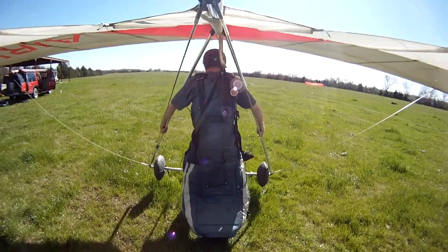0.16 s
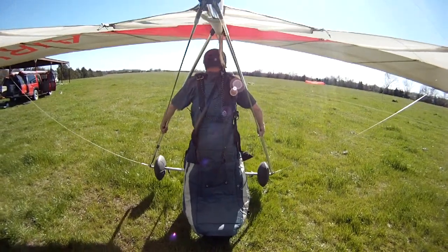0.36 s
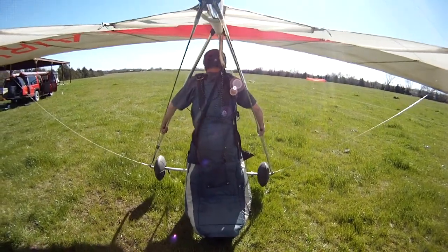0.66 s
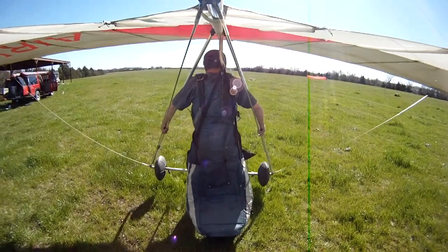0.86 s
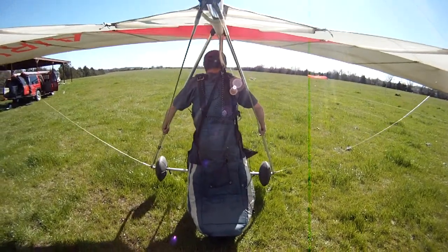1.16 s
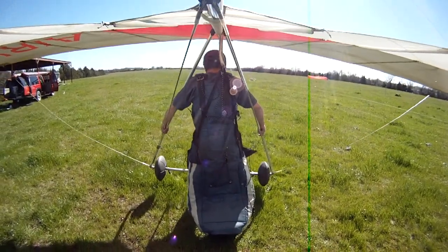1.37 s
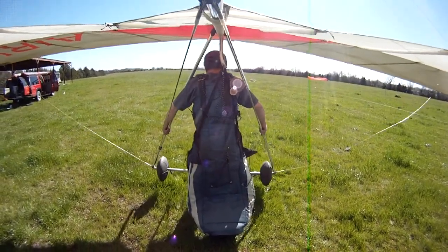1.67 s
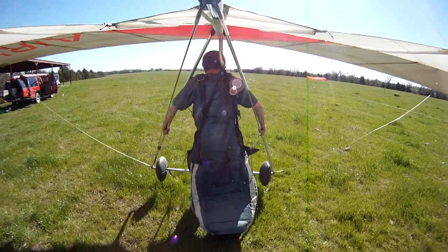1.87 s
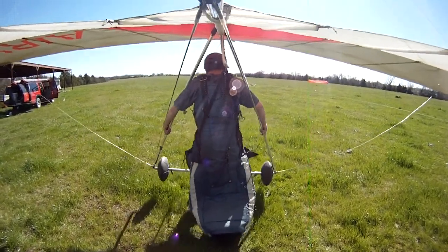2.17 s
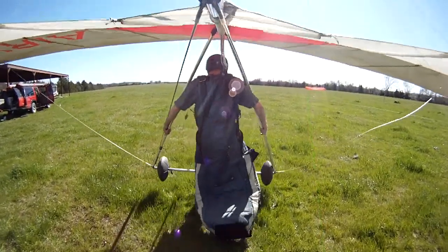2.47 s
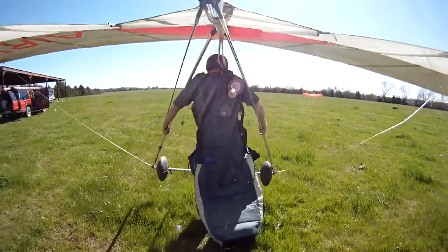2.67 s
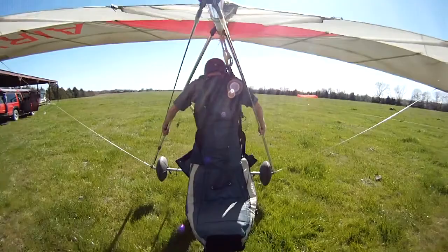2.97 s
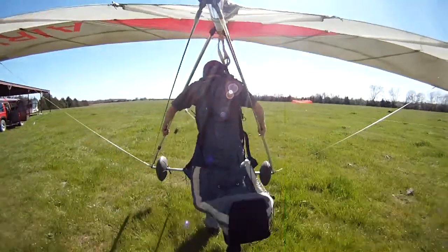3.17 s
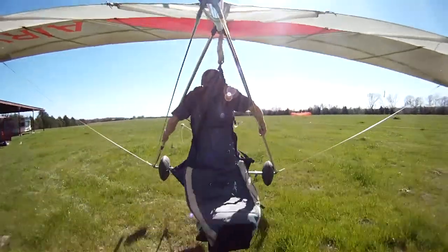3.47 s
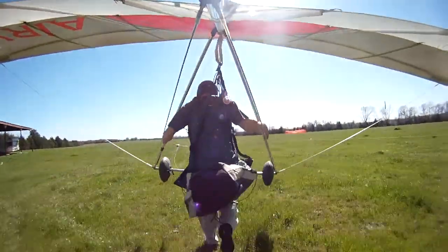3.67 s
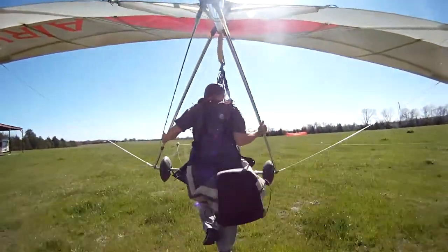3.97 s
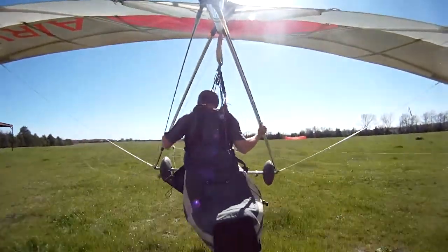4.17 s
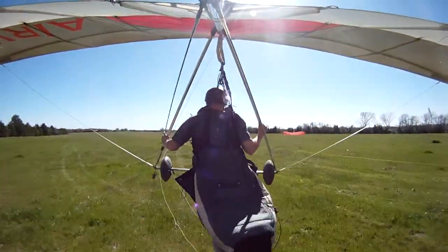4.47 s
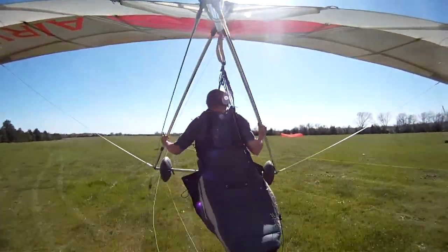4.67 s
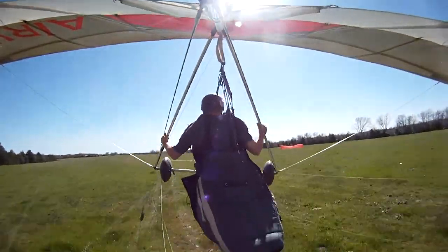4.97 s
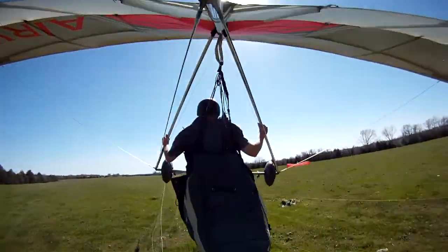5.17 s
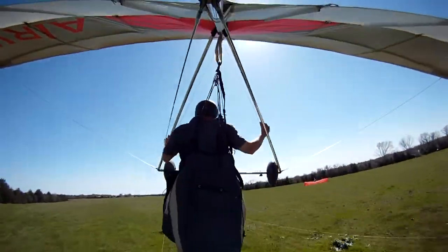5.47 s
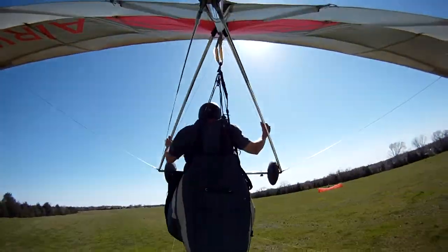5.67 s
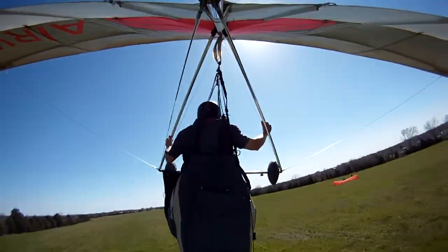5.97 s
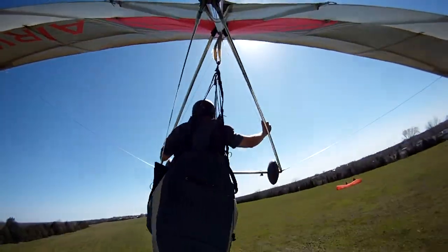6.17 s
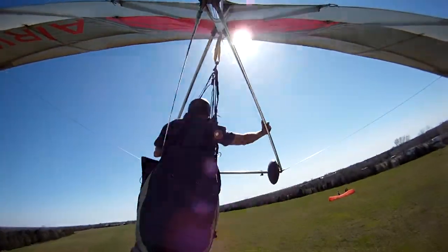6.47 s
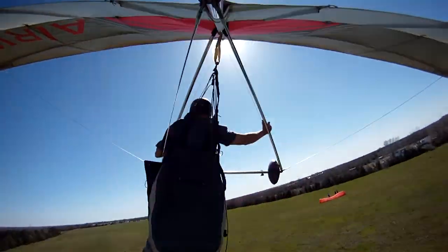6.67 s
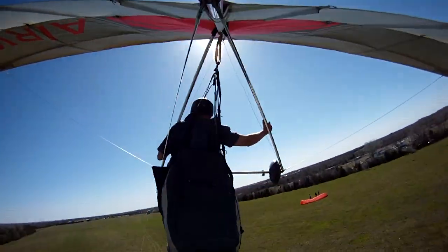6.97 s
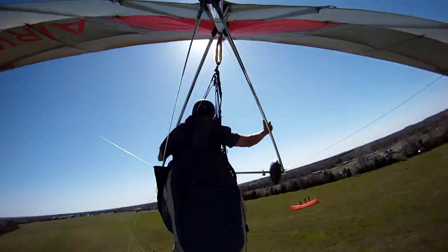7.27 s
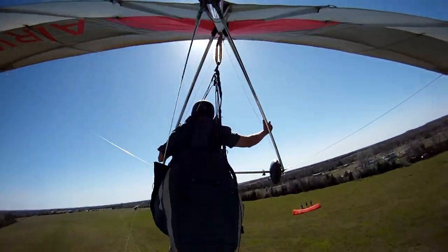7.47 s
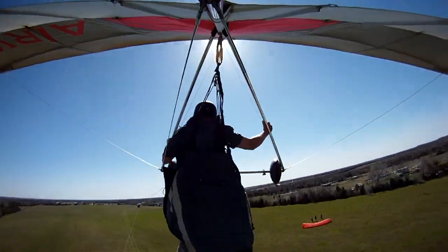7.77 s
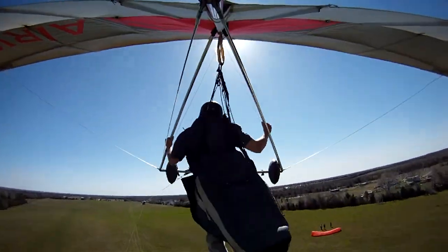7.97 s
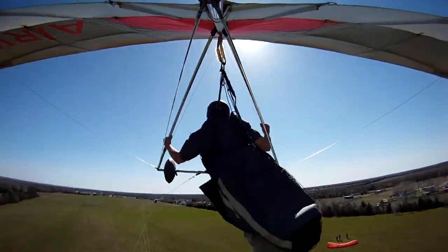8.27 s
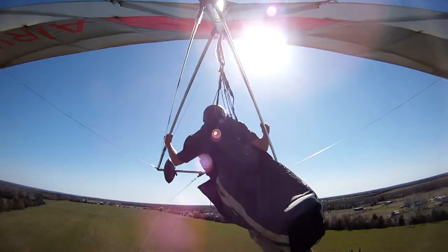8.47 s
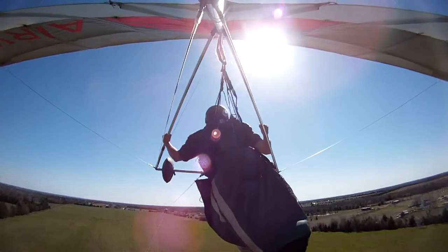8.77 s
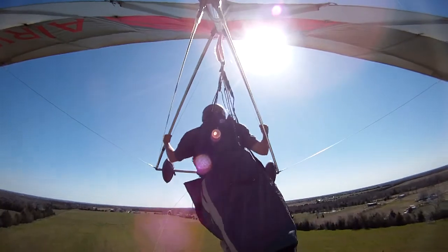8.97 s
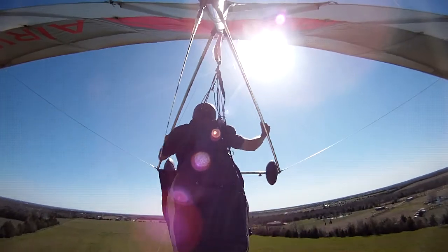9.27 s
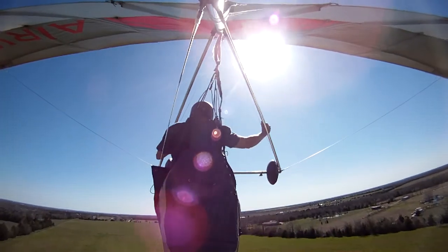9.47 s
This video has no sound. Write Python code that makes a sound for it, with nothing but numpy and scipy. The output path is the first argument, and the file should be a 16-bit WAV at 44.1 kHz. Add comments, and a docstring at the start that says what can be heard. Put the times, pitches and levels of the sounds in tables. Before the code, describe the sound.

A quiet field with small clicks and a distant engine revving, a burst of hard clattering, then steady loud wind rumble on a flying hang glider.

```python
"""Hang glider under tow, from the keel

A grass field, with the microphone in a cased camera on the keel; a distant tow engine revs up as a few partials.
Close by, the frame's modes knock and rattle through the case in the take-off run; webbing scrapes and squeaks.
Wind then buffets the microphone as low noise and hisses round the case as noise through its air resonances.
Loose rigging ticks in fading bouts of ringing blows, and the sail flicks as dry bursts of noise."""
import sys
import numpy as np
from scipy import signal
from scipy.fft import rfft, irfft
from scipy.io import wavfile
from scipy.ndimage import uniform_filter1d, minimum_filter1d

SR = 44100
rng = np.random.default_rng(int(sys.argv[2]) if len(sys.argv) > 2 else 0)


def output_pcm(signal):
    """Save a mono or channel-first signal as 16-bit PCM at the path in sys.argv[1].

    Samples are clipped to [-1, 1] before scaling.
    """
    pcm = np.clip(np.atleast_2d(signal).T, -1, 1) * 32767
    wavfile.write(sys.argv[1], SR, np.round(pcm).astype(np.int16))


N = 423801
TIME = np.arange(N) / SR  # s
RING_TIME = np.arange(4096) / SR  # s, span of one short sound

# Levels in the tables are before the trims and random swells in the functions; spectra are relative.
# open field and rustling grass: [f/Hz, density/dB per Hz]
FIELD_COLOUR = [(30, -2), (70, -7), (180, -5), (330, -6), (420, -2.5), (700, -15.5), (1200, -21),
                (3000, -19.5), (4500, -36), (7500, -35), (9500, -30.5), (12000, -33.5), (15000, -38)]
# soft hollow hum before the run: [t/s, level/dB]
HUM = [(.55, -61), (.8, -44.5), (1.1, -40), (1.35, -50), (1.6, -54)]
# distant tow engine: [t/s, cycle rate f/Hz, level/dB]
ENGINE = [(0, 22.8, -42), (1.2, 22.6, -41), (1.9, 25.4, -37), (2.3, 26.2, -35.5), (2.82, 31, -31),
          (3.3, 35.8, -29), (3.6, 38.5, -35), (4.4, 41, -45)]
# engine partials: [multiple of the cycle rate, level/dB]
ENGINE_PARTIALS = [(3, -6), (4, -13), (5, -2), (6, 0.5), (7, -7), (8, -10), (9, -15), (10, -10.5)]
# small dry snaps of sailcloth: [t/s, peak level/dB]
SNAPS = [(1.1872, -29.5), (1.256, -32.5), (2.834, -20), (6.1818, -33), (6.3255, -33), (8.3872, -19),
         (8.8922, -23.5)]
# brief flapping of the sail edge: [start t/s, end t/s, flap rate f/Hz, peak level/dB]
FLAPPING = (8.5, 9.01, 35.5, -33.5)
# squeaks of the hang strap: [t/s, peak level/dB, pitch f/Hz, length t/s]
SQUEAKS = [(2.921, -15, 1480, 0.021), (3.034, -19.5, 1410, 0.018), (3.135, -28, 1400, 0.013),
           (6.94, -18, 1730, 0.0075)]
# harness scrapes on the frame: [t/s, length t/s, level/dB]
SCRAPES = [(2.388, 0.072, -24), (2.572, 0.17, -27), (2.886, 0.044, -22), (3.527, 0.055, -22),
           (3.628, 0.061, -22.5), (6.942, .02, -34.5), (8.433, 0.15, -35.5)]
# modes of the rigging: [f/Hz, width f/Hz, level/dB]
RIGGING_MODES = [(1090, 1000, -4.5), (1810, 150, -5), (2060, 72, -3), (2538, 108, 5.5), (3143, 150, -5.5),
                 (3720, 270, -3.5), (5140, 400, -15), (6790, 260, -16.5), (8190, 150, -9.5),
                 (8930, 140, -13.5), (9540, 110, -5.5), (10100, 720, -17), (12200, 290, -28),
                 (14430, 250, -10.5), (14900, 420, -17)]
# bouts of rigging flutter: [t/s, length t/s, tick rate f/Hz, peak level/dB of the first tick]
FLUTTERS = [(3.963, 0.006, 30, -15.5), (4.002, 0.078, 34.5, -14), (4.178, .055, 63, -18.5),
            (4.261, .095, 30.6, -18.5), (4.437, .14, 27.4, -26), (4.669, .035, 60, -15.5),
            (4.851, .29, 31.3, -14.5), (5.194, .04, 31, -23), (6.657, .09, 45, -13), (6.788, .1, 20.4, -21),
            (6.968, 0, 30, -18.5), (7.058, .03, 34, -16.5), (7.33, 0.0042, 30, -23.5), (7.38, .06, 36, -18),
            (7.573, .045, 21, -20), (8.031, .07, 28, -25.5), (8.144, .06, 68, -23.5),
            (8.234, .04, 27.5, -18), (8.387, 0, 23, -20), (8.485, 0, 30, -15.5), (8.642, .06, 16.6, -16),
            (8.794, 0, 30, -21.5), (9.073, 0, 33.5, -17.5)]
# light breeze on the ground: [t/s, level/dB]
BREEZE = [(0, -38), (.2, -61), (.7, -59), (1.13, -49.5), (2.22, -36), (2.6, -27.5), (2.75, -42),
          (2.88, -25.5), (3.6, -23)]
# spectrum of the breeze at the microphone: [f/Hz, density/dB per Hz]
BREEZE_COLOUR = [(20, 0), (45, -4), (80, 1.5), (120, -7.5), (220, -12.5), (400, -19.5), (600, -22),
                 (1500, -33)]
# spectrum of the wind buffeting: [f/Hz, density/dB per Hz]
BUFFET_COLOUR = [(10, -16), (25, -3.5), (50, 1.5), (90, 0.5), (150, -2.5), (200, -7), (300, -14),
                 (420, -18.5), (550, -20), (750, -35.5), (1300, -47.5), (2500, -59.5)]
# airflow round the case: [t/s, hiss level/dB, breathy whistle level/dB]
AIRFLOW = [(3.8, -38, -42), (4.2, -39.5, -34.5), (4.25, -46, -46), (4.66, -49.5, -44), (5.11, -46, -43.5),
           (5.85, -49, -45.5), (6.89, -45.5, -41.5), (7.11, -50.5, -44), (7.6, -49.5, -47.5),
           (8.0, -49, -44.5), (8.19, -47.5, -50), (8.27, -45, -35), (8.34, -47, -51), (8.48, -43, -34.5),
           (8.73, -48.5, -46.5), (9.02, -48.5, -45.5), (9.31, -42, -37), (9.6, -43, -44)]
# spectrum of the airflow hiss: [f/Hz, density/dB per Hz]
HISS_COLOUR = [(300, 2.5), (700, -3), (1300, 4.5), (1600, -4), (2900, -5), (3400, -13.5), (4000, -12),
               (4350, -18), (7500, -20.5), (9300, -17), (10500, -17), (13600, -24), (15200, -15)]
# air resonances of the case: [f/Hz, width f/Hz, level/dB]
CAVITIES = [(2440, 136, 2), (3014, 72, 0), (3900, 200, -6.5), (8250, 300, -14.5), (9200, 330, -10.5),
            (10910, 100, -7), (11860, 370, -5.5), (12080, 330, -4), (13200, 120, -15), (14400, 130, -9)]
# single eddies that hit the microphone: [t/s, pressure peak level/dB, pitch f/Hz]
EDDIES = [(3.652, 2, 76), (3.783, -7, 60), (7.642, 11.5, 99.8), (9.51, 10.5, 93)]
# frame shaken on the ground: [t/s, rattle level/dB, case boom level/dB]
SHAKE = [(0.0, -40, -41), (0.26, -47, -40), (0.48, -57, -52.5), (0.79, -51.5, -51.5), (1.26, -54, -53),
         (1.5, -50.5, -56), (1.75, -40, -38), (1.89, -39, -42), (2.05, -42.5, -45), (2.34, -31, -30),
         (2.53, -29, -30), (2.69, -25.5, -29), (2.77, -34, -39), (2.92, -35, -37), (3.22, -36, -33),
         (3.55, -30, -28.5), (3.77, -31.5, -36), (4.1, -31, -30)]
# modes of the frame and case: [f/Hz, width f/Hz, level/dB]
FRAME_MODES = [(469, 86, 1), (553, 60, 9.5), (632, 47, 2.5), (904, 100, -0.5), (1031, 52, 1.5),
               (1286, 45, -0.5), (1463, 82, 2), (1666, 180, -1.5), (1938, 240, 1.5), (2164, 122, -0.5),
               (2562, 40, -1.5), (2996, 170, -6), (3560, 450, -11.5), (3748, 170, -4.5), (3886, 78, -3),
               (5080, 610, -14.5), (6900, 950, -15.5), (8187, 160, -7), (8970, 120, -12), (9470, 79, -13),
               (9980, 96, -8), (10730, 270, -14), (11500, 310, -18.5), (13270, 170, -12.5),
               (14200, 340, -14), (14330, 350, -9.5), (15400, 450, -15)]
# loudest frame knocks: [t/s, peak level/dB, boom level/dB re peak, treble level/dB re peak, favoured f/Hz]
KNOCKS = [(0.278, -19.5, -15, -14.5, 1480), (0.351, -16.5, -12, -13, 1490), (0.366, -19, -9.5, -7.5, 1450),
          (0.439, -25, -11, -14, 1460), (0.465, -25, -8, -15, 1480), (0.701, -21.5, -11, -9, 1460),
          (0.93, -16.5, -14.5, -16, 1825), (1.01, -14, -16, -15, 1920), (1.435, -26.5, -10, -8, 2040),
          (1.447, -24, -18, -12.5, 2220), (1.523, -21.5, -8, -5, 1050), (1.798, -16.5, -14.5, -5.5, 1540),
          (2.017, -12, -11.5, -8, 1880), (2.081, -11.5, -5, -8, 2980), (2.126, -27, 7, -7, 1460),
          (2.193, -20, 0.5, -5, 2030), (2.242, -19, 2, -4.5, 1500), (2.315, -13, 1.5, -10.5, 1320),
          (2.354, 0, -4, -7.5, 1270), (2.375, -8, -9, -0.5, 1620), (2.398, -8, 1, -3, 2100),
          (2.528, -9, -8, -14, 1060), (2.568, -11.5, -15, -20, 1670), (2.585, -7, -24, -19, 1490),
          (2.614, -5.5, -28, -13, 2150), (2.641, -3, -28, -6.5, 2180), (2.652, 5.5, -41, -6.5, 1700),
          (2.668, 2.5, -36, -5.5, 1280), (2.749, -11.5, -18, -11, 1700), (2.857, -5, -33, -6.5, 2040),
          (2.907, -13.5, 0, -15, 1460), (2.954, -11.5, 0.5, -13.5, 1290), (3.207, -20, 8.5, -20, 850),
          (3.24, -16, -21, -7.5, 1860), (3.405, -10, -1, 1, 1980), (3.415, -10.5, 1.5, -13, 1490),
          (3.473, -19.5, 11.5, -13, 930), (3.51, -12.5, -6, -8, 1840), (3.53, -13.5, -27, -6.5, 1450),
          (3.631, -9, -6, -10.5, 990), (3.685, -8.5, -7, -5, 1750), (3.733, -9.5, -7.5, -5.5, 1070),
          (6.939, -8, -10.5, -15.5, 1650), (8.47, -11.5, -8, -3, 1990)]

# a bout of flutter dies down; its ticks are uneven
TICK_FADE_DB_PER_S, TICK_SCATTER_DB, TICK_JITTER_S = 37, 1.5, 0.00099
# buffeting sets in during the run and holds at flying speed
RUN_S, FLYING_S, BUFFET_DB, GUST_DB = 3.09, 4.01, -16, 1.0
# gain of hiss and whistle, and how far they swell and sink with the gusts
HISS_DB, WHISTLE_DB, SWELL_DB = 6.5, 1, 2.1
# lighter knocks among the rattle: mean rate at each contact point, and their level relative to it
JOLTS_PER_S, JOLT_DB = 7, -4.5
# limiter threshold, recovery and look-ahead; then the top of the audible band
CEILING_DB, RELEASE_DB_PER_S, LOOK_AHEAD_S = 0.05, 78, .003
TOP_HZ = 15300


def undb(db):
    """Decibels to gain."""
    return 10 ** (np.asarray(db) / 20)


def unit(x):
    """Scale to rms 1."""
    return x / np.sqrt(np.mean(x ** 2))


def curves(table):
    """Each column of a table, joined by straight lines in time."""
    s, *columns = np.transpose(table)
    return [np.interp(TIME, s, column) for column in columns]


def fade(start, end):
    """Ramp from 0 at start to 1 at end, in s."""
    return np.clip((TIME - start) / (end - start), 0, 1)


def walk(rate):
    """Random levels, rate per s, slewed from one to the next; spread near 1."""
    hold = max(int(SR / rate), 2)
    steps = np.repeat(rng.standard_normal(N // hold + 1), hold)
    return 1.2 * uniform_filter1d(steps, hold)[:N]


def band(x, lo_hz, hi_hz):
    """Causal band-pass."""
    sos = signal.butter(3, [lo_hz, min(hi_hz, .45 * SR)], "band", fs=SR, output="sos")
    return signal.sosfilt(sos, x)


def noise(colour, resonances=()):
    """Noise with a smooth spectrum and resonances on top, at rms 1."""
    f = np.arange(N // 2 + 1) * SR / N + 1e-3
    hz, db = np.transpose(colour)
    power = undb(np.interp(np.log(f), np.log(hz), db)) ** 2
    # roll off an octave beyond either end of the table
    power = power / (1 + (f / hz[-1] / 2) ** 4) / (1 + (hz[0] / f / 2) ** 4)
    for centre, width, peak_db in resonances:
        offset = (f - centre) / width * np.sqrt(2)
        power = power + (undb(peak_db) / (1 + offset ** 2)) ** 2
    return unit(irfft(rfft(rng.standard_normal(N)) * np.sqrt(power), N))


def ring(modes, detune, uneven_db=0):
    """Decaying modes of a struck body; each contact point gives them other phases and strengths."""
    hz, width, db = np.transpose(modes)[:, :, None]
    hz = hz * (1 + detune * rng.standard_normal(hz.shape))
    size = undb(db + uneven_db * rng.standard_normal(hz.shape)) * width
    phase = 2 * np.pi * (hz * RING_TIME + rng.random(hz.shape))
    decay = np.exp(-np.pi * width * RING_TIME)
    onset = 1 - np.exp(-RING_TIME / 0.00066)
    return np.sum(size * decay * np.sin(phase), axis=0) * onset


def strike(modes, chatter, chatter_s):
    """One blow and its short chatter of re-contacts, ringing the modes."""
    force = chatter * rng.standard_normal(len(RING_TIME)) * np.exp(-RING_TIME / max(chatter_s, 1e-4))
    force[0] += 1
    return signal.fftconvolve(force, ring(modes, detune=0.0053))[:len(RING_TIME)]


def grains(rate, spread_db):
    """Random tiny contacts of uneven size and either sign."""
    hits = rng.random(N) < rate / SR
    sizes = undb(spread_db * np.clip(rng.standard_normal(N), -2, 2))
    return hits * sizes * rng.choice([-1, 1], N)


def shaken(modes, rate, spread_db, count=4):
    """Random small contacts ring a body at several points, each with its own colour."""
    total = np.zeros(N)
    for _ in range(count):
        contacts = grains(rate, spread_db)
        total += signal.oaconvolve(contacts, ring(modes, detune=0.0015, uneven_db=4.5))[:N]
    return unit(total)


def add(out, s, sound, peak_db):
    """Mix a sound in at a time and a peak level."""
    i = max(int(s * SR), 0)
    out[i:i + len(sound)] += (sound * undb(peak_db) / np.abs(sound).max())[:N - i]


def field():
    """The quiet open field: coloured noise, swelling gently."""
    return noise(FIELD_COLOUR) * undb(-46.0 + walk(4.4))


def hum():
    """A brief hollow hum: a narrow band of noise."""
    db, = curves(HUM)
    return unit(band(rng.standard_normal(N), 248, 289)) * undb(db)


def engine():
    """The distant tow engine: only its low, slightly wavering partials carry."""
    hz, db = curves(ENGINE)
    turns = np.cumsum(hz * (1 + 0.0028 * walk(12))) / SR
    drone = np.zeros(N)
    for multiple, part_db in ENGINE_PARTIALS:
        strength = undb(part_db + 1.7 * walk(3.62))
        drone += strength * np.sin(2 * np.pi * (round(multiple) * turns + rng.random()))
    return unit(drone) * undb(db - 1.5)


def sail():
    """The sailcloth flicks and flaps: dry snaps of decaying noise that ring nothing."""
    out = np.zeros(N)
    start, end, rate, flap_db = FLAPPING
    flaps = [(s, flap_db) for s in np.arange(start, end, 1 / rate)]
    for s, db in list(SNAPS) + flaps:
        burst = rng.standard_normal(len(RING_TIME)) * np.exp(-RING_TIME / 0.0042)
        add(out, s, band(burst, 1470, 7500), db + 2.0)
    return out


def squeaks():
    """The hang strap slips on the keel: a brief rough tone that sags as the slip slows."""
    out = np.zeros(N)
    for s, db, hz, length in SQUEAKS:
        progress = np.clip(RING_TIME / length, 0, 1)
        roughness = 0.085 * walk(810)[:len(RING_TIME)]
        pitch = hz * (1 + 0.13 * (.5 - progress) + roughness)
        tone = np.sin(2 * np.pi * np.cumsum(pitch) / SR)
        add(out, s, np.sin(np.pi * progress) * tone, db)
    return out


def scrapes():
    """Webbing sticks and slips along the frame in short strokes of dense small contacts."""
    strokes = np.zeros(N)
    for s, length, db in SCRAPES:
        release = 1 - fade(s + length, s + length + 0.029)
        strokes += undb(db) * fade(s, s + 0.0029) * release
    contacts = shaken(FRAME_MODES, rate=400, spread_db=2.5)
    return unit(band(contacts, 580, 18000)) * strokes


def rigging():
    """Loose rigging flutters on the tubes in bouts of fading ticks, with lighter taps through the flight."""
    out = np.zeros(N)
    for s, length, rate, db in FLUTTERS:
        for k in range(round(length * rate) + 1):
            # the first tick of a bout is exact
            late, louder = rng.standard_normal(2) * min(k, 1)
            tick = strike(RIGGING_MODES, chatter=0.093, chatter_s=0.0044)
            tick_db = db - TICK_FADE_DB_PER_S * k / rate + TICK_SCATTER_DB * louder + 0.83
            add(out, s + k / rate + TICK_JITTER_S * late, tick, tick_db)
    # the taps follow the airflow
    hiss_db, _ = curves(AIRFLOW)
    taps = shaken(RIGGING_MODES, rate=12, spread_db=5.5) * undb(hiss_db - 4)
    return out + taps * fade(3.29, 3.35)


def wind():
    """A breeze grows into buffeting; the same eddies make the hiss and whistle round the case flutter."""
    breeze_db, = curves(BREEZE)
    hiss_db, whistle_db = curves(AIRFLOW)
    flying, eddies, gusts = fade(RUN_S, FLYING_S), walk(45), GUST_DB * walk(14)
    breeze = noise(BREEZE_COLOUR) * undb(breeze_db + 1.0) * (1 - fade(3.03, 3.66))
    buffet = noise(BUFFET_COLOUR) * undb(BUFFET_DB + 1.97 * eddies + gusts) * flying
    flutter_db = 2.7 * eddies + gusts + SWELL_DB * walk(11)
    hiss = noise(HISS_COLOUR, CAVITIES) * undb(hiss_db + flutter_db + 1.3 * walk(250) + HISS_DB)
    breath = noise([(600, -9), (1400, -55)], [(1077, 60, 0)])
    whistle = breath * undb(whistle_db + flutter_db + WHISTLE_DB)
    return breeze + buffet + (hiss + whistle) * fade(3.62, 4.3)


def thumps():
    """A large eddy passes the microphone as one deep swing of pressure."""
    out = np.zeros(N)
    t = RING_TIME - RING_TIME.mean()
    for s, db, hz in EDDIES:
        u = (np.pi * hz * t) ** 2
        # start early so that the swing is centred on its time
        add(out, s + t[0], (2 * u - 1) * np.exp(-u), db)
    return out


def rattle():
    """Dense small contacts and sparser jolts shake the frame in lumps until the glider leaves the ground."""
    rattle_db, boom_db = curves(SHAKE)
    dense = shaken(FRAME_MODES, rate=200, spread_db=2)
    jolts = undb(JOLT_DB) * shaken(FRAME_MODES, rate=JOLTS_PER_S, spread_db=5.0)
    body = (dense + jolts) * undb(2.1 * walk(40))
    clatter = unit(band(body, 760, 17000)) * undb(rattle_db + 1.0)
    boom = unit(band(body, 358, 684)) * undb(boom_db + 2.0)
    return (clatter + boom) * (1 - fade(3.57, 4.32))


def knocks():
    """Fittings knock: a bright crack, the ring of the tubes and a slower boom of the case."""
    out = np.zeros(N)
    hz, width, mode_db = np.transpose(FRAME_MODES)
    rattle_db, _ = curves(SHAKE)
    for s, db, boom_db, treble_db, ring_hz in KNOCKS:
        # the place that is struck favours the modes near one pitch
        favour_db = 7 / (1 + (np.log(hz / ring_hz) / 0.16) ** 2)
        # at rest each blow is nearly a single click; on a shaking frame it chatters
        chatter = np.interp(rattle_db[int(s * SR)], [-52, -36], [.05, .25])
        modes = np.transpose([hz, width, mode_db + favour_db])
        blow = strike(modes, chatter, chatter_s=0.0046)
        add(out, s, band(blow, 916, 2680), db - 0.06)
        add(out, s, band(blow, 402, 674), db + boom_db + 0.7)
        add(out, s, band(blow, 2800, 13200), db + treble_db + 5.0)
    return out


def limiter(x):
    """Turns down just ahead of an overload and recovers at a steady rate in dB."""
    over_db = np.maximum(20 * np.log10(np.abs(x) + 1e-9) - CEILING_DB, 0)
    recovery_db = RELEASE_DB_PER_S * TIME
    gain_db = recovery_db - np.maximum.accumulate(over_db + recovery_db)
    ahead = max(int(LOOK_AHEAD_S * SR), 1)
    return x * undb(uniform_filter1d(minimum_filter1d(gain_db, 2 * ahead), ahead))


def scene():
    """Field, distant engine and close glider meet at the one microphone."""
    air = field() + hum() + wind() + thumps()
    glider = sail() + squeaks() + scrapes() + rigging() + rattle() + knocks()
    return (air + engine() + glider)[None]


def record(dry):
    """The sound port cancels a narrow treble band; overloads duck the level and the top is cut."""
    ported = signal.lfilter(*signal.iirnotch(6000, 4.5, fs=SR), dry)
    top_cut = signal.ellip(10, .2, 70, TOP_HZ, fs=SR, output="sos")
    return signal.sosfilt(top_cut, limiter(ported[0]))[None]


dry = scene()
out = record(dry)
output_pcm(out)
```